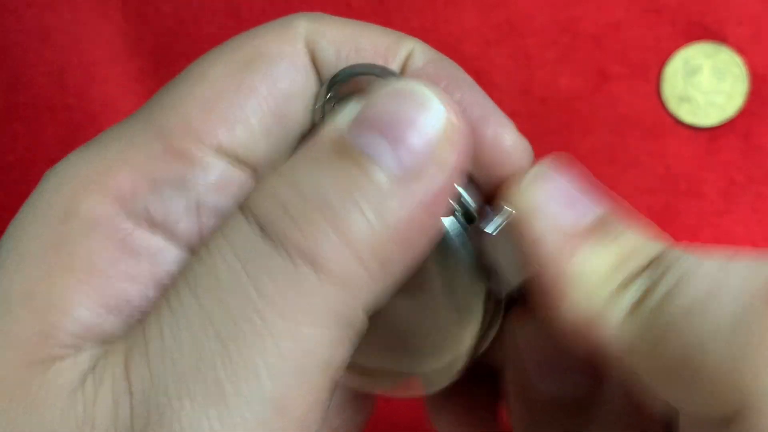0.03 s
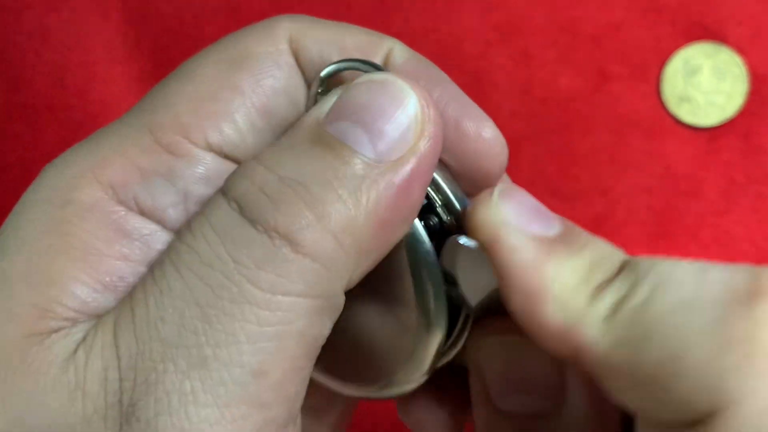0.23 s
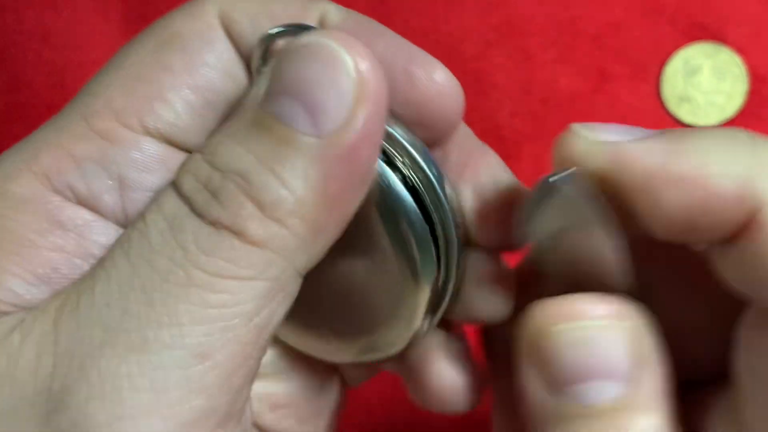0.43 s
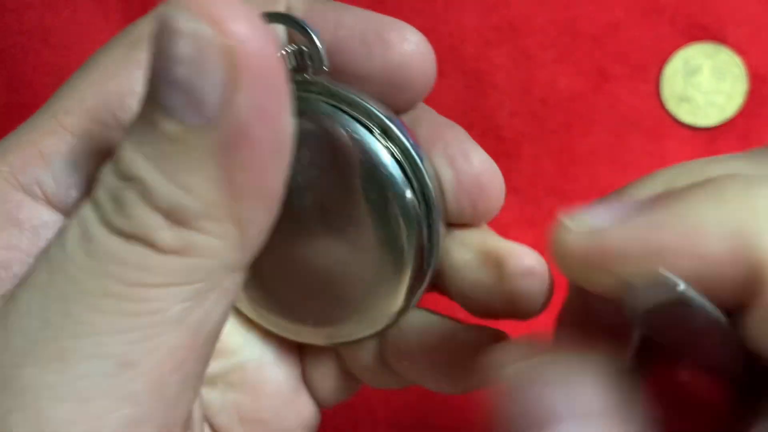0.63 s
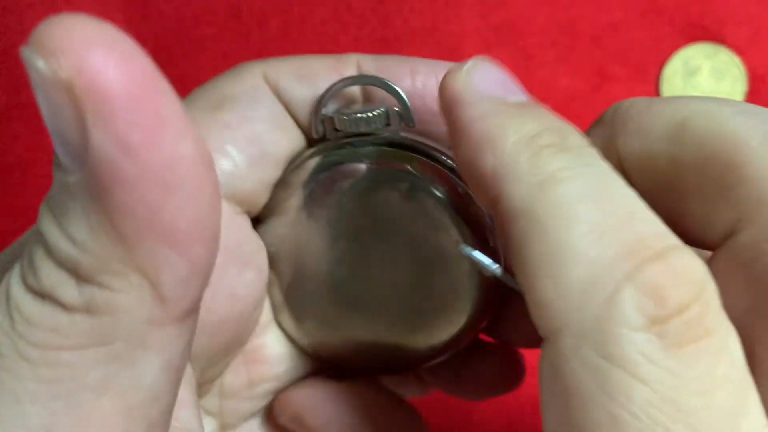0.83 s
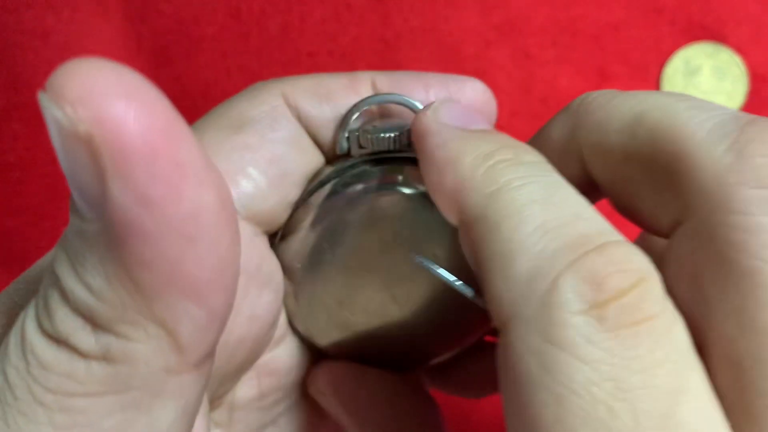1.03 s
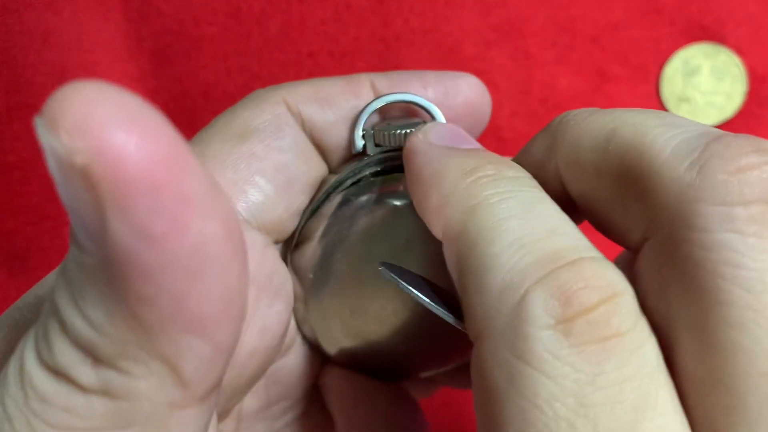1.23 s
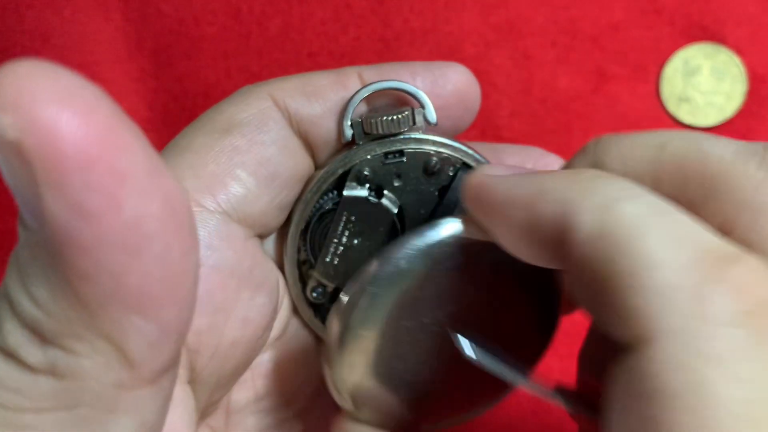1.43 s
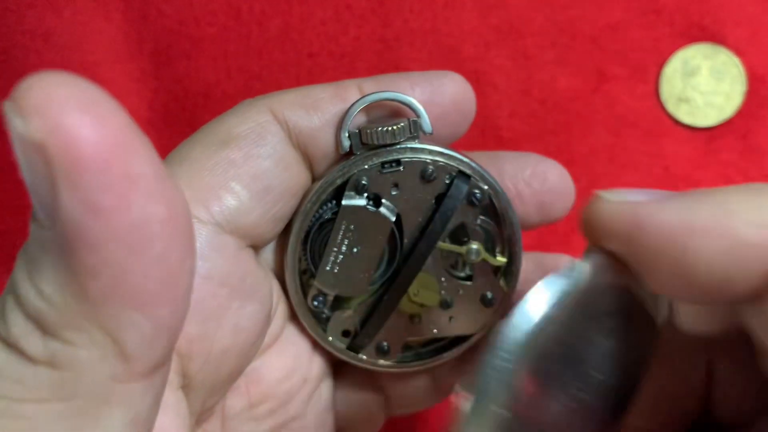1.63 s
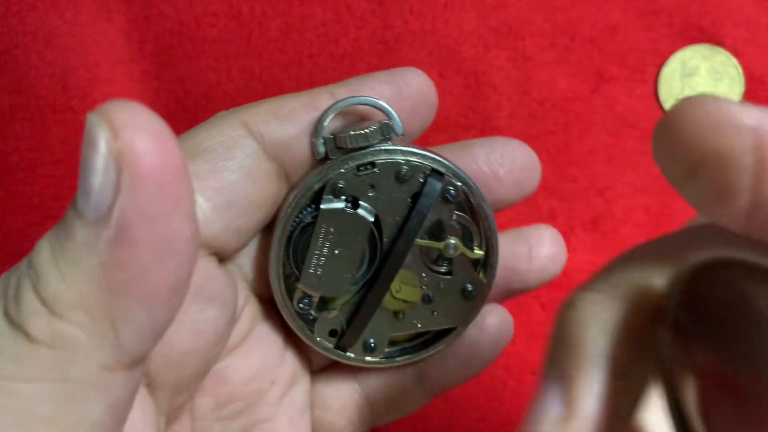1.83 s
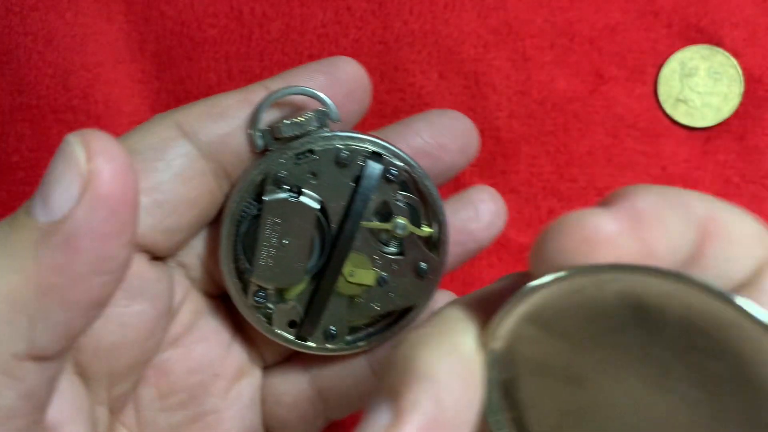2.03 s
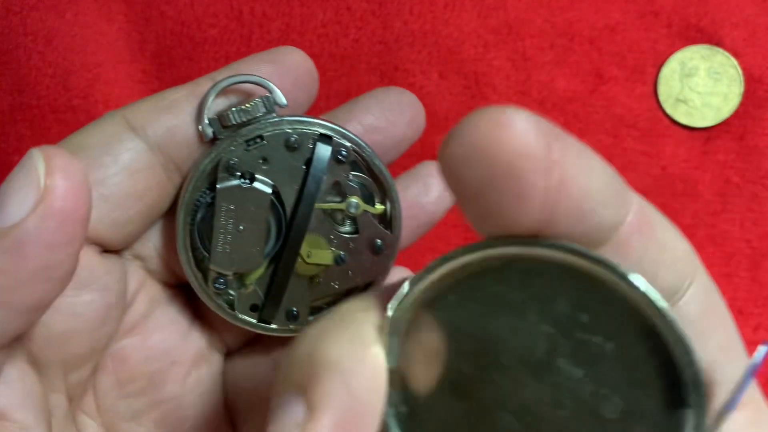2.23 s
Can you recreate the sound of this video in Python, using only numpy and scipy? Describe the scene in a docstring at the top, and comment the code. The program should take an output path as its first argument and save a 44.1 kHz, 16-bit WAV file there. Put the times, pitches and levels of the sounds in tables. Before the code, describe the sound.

A sharp steel snap as a blade pries the back off a pocket watch. Lighter knocks, scrapes and a thin clink follow, with soft finger rubbing and faint, quick ticking, heard close up in a small, quiet room.

```python
"""A sharp steel snap comes first: a blade pries the back off a pocket watch, close by in a small room.
The freed back knocks against the rim, which makes the case ring, and clinks as it is lifted away.
Steel scrapes on steel and fingers rub. The clockwork ticks four times a second over a faint low hum."""
import sys
import numpy as np
from scipy import signal
from scipy.fft import rfft, irfft
from scipy.io import wavfile

SR = 44100
rng = np.random.default_rng(int(sys.argv[2]) if len(sys.argv) > 2 else 0)


def put_to_file(sound):
    """Save the sound as 16-bit audio at rate SR, in the file named by the first command-line argument."""
    columns = np.atleast_2d(sound).T  # one column per channel
    safe = np.clip(columns, -1, 1)
    whole_steps = np.round(safe * 32767)
    wavfile.write(sys.argv[1], SR, whole_steps.astype(np.int16))


N = 101429

# A mode is one tone that an object rings with. A fade is the time a sound takes to drop by 60 dB.
# Bright modes of the rim letting go: pitch_hz, level_db
RIM_MODES = [(8850, -7), (9950, -7.5), (11450, -5), (12950, -9.5)]
# Thump of the hands: pitch_hz, level_db, fade_s
JOLT_MODES = [(467, -27.5, .018), (301, -29, 0.032), (170, -36, .03)]
# Steel knocking on the case: start_s, ring_db, crack_db, left_minus_right_db, favoured_hz, fade_s
KNOCK_EVENTS = [(0.05, -35.5, -39, 5.5, 1500, 0.036), (0.0623, -9.5, -9, 1, 1280, 0.0058),
                (0.064, -12, -15.5, -15, 1760, 0.013), (0.2745, -44, -44, -12, 2450, 0.027),
                (0.2957, -22, -28.5, 7, 4700, 0.0067), (0.2973, -26.5, -37, -14.5, 2200, 0.017),
                (0.482, -45.5, -48, -12.5, 1520, .04), (0.4921, -38.5, -54, -4, 4000, 0.025),
                (0.5149, -54, -44.5, -1, 3900, .02), (0.525, -43, -59, -9.5, 1450, 0.021),
                (0.64, -45, -47.5, -7, 2375, 0.029), (0.8112, -45.5, -44.5, -1, 3450, 0.03),
                (0.9156, -41, -40, -3.5, 2000, 0.024), (1.028, -55, -52, -9.5, 1560, 0.073)]
# Case modes that the hand muffles: pitch_hz, level_db
MUFFLED_MODES = [(730, -12), (1030, -6), (1300, -9.5), (1580, -0.5), (1820, -7.5), (2080, -8.5), (2370, 2),
                 (3450, -9), (3950, -9), (4420, -6.5), (5740, -10), (7100, -13.5)]
# Case modes that escape the hand and ring on: pitch_hz, level_db, fade_s
FREE_MODES = [(1497, -28, .17), (2354, -29, 0.077), (4410, -29, 0.11)]
# Tone colour of cracking steel: pitch_hz, level_db
CRACK_COLOUR = [(350, -14), (750, -3), (1400, 3), (2400, 3), (3200, -10), (6500, -6.5), (8800, -3),
                (11500, -5.5), (13300, -7.5), (16000, -19)]
# Light touches on the loose back: start_s, level_db
CLINK_EVENTS = [(0.9135, -41), (1.289, -56.5)]
# Modes of the loose back: pitch_hz, level_db, fade_s
BACK_MODES = [(6760, -9.5, 0.019), (8370, -15.5, 0.2), (9200, -9, 0.046), (9800, -11, 0.045),
              (11200, -8, 0.034), (12100, 0.5, 0.03)]
# Clockwork beats, tock and tick in turn: start_s, level_db
BEAT_EVENTS = [(.5553, -37), (.8107, -55), (1.0553, -44.5), (1.3111, -43), (1.5558, -39), (1.8121, -43.5),
               (2.0579, -41)]
# Modes of the clockwork: pitch_hz, tock_db, tick_db, fade_s
CLOCKWORK_MODES = [(2400, -27.5, -48, 0.018), (5670, -15.5, -19, 0.015), (8300, -11, -15, .025),
                   (10400, -19.5, -6, 0.0089), (11200, -10, 0.5, 0.019), (11950, -15.5, 0, 0.021),
                   (12900, -18.5, -8.5, 0.017), (14500, -8, -25, 0.011)]
# Blade and back sliding on the rim: start_s, length_s, level_db
SCRAPE_EVENTS = [(0.287, 0.0081, -46.5), (0.466, 0.096, -55.5), (0.744, 0.099, -57), (1.755, 0.095, -64)]
# Tone colour of a scrape: pitch_hz, level_db
SCRAPE_COLOUR = [(600, -27), (1100, -9), (1600, 6.5), (3000, -6.5), (4300, -3), (7000, -8), (12000, -9.5),
                 (15500, -24)]
# Nail and blade tapping steel: start_s, level_db
TOUCH_EVENTS = [(0.3744, -50.5), (0.665, -56.5), (1.2694, -60.5), (1.582, -55), (1.772, -56), (1.9436, -63),
                (2.0152, -59), (2.2717, -55.5), (2.292, -57)]
# Tone colour of the smallest metal contacts: pitch_hz, level_db
CONTACT_COLOUR = [(2000, -32), (5000, -7), (7500, -11), (9500, -0.5), (12300, -2), (15500, -15)]
# Crackle of steel moving in the fingers: time_s, level_db
CRACKLE_LOUDNESS = [(.85, -94), (1.02, -66), (1.15, -80.5), (1.55, -79.5), (1.9, -88)]
# Skin rubbing on skin and steel: time_s, level_db
RUB_LOUDNESS = [(0, -55), (.12, -56.5), (.42, -54.5), (.66, -57.5), (.8, -53.5), (.94, -57.5), (.965, -74),
                (1.16, -70.5), (1.2, -55), (1.335, -53), (1.36, -70.5), (1.405, -68), (1.435, -51.5),
                (1.5, -55), (1.76, -55), (1.78, -78.5), (2.3, -86.5)]
# Tone colour of the rubbing: pitch_hz, level_db
RUB_COLOUR = [(50, -5), (110, -2.5), (280, 1.5), (430, -3.5), (620, -11), (900, -7.5), (1500, -19.5),
              (2300, -13.5), (7000, -31.5), (15000, -43)]
# Tone colour of the room's reflections: pitch_hz, level_db
ROOM_COLOUR = [(450, -7), (800, 2.5), (2500, -7), (5500, -2.5), (8800, -5), (13000, -8.5), (16000, -17.5)]
# Tone colour of the steady room noise: pitch_hz, level_db
AIR_COLOUR = [(60, -6.5), (120, -9.5), (250, -8), (500, -17), (1500, -6), (2000, -14), (3500, -19),
              (6200, -19), (9500, -23), (13500, -29), (15500, -45)]
# A low hum that comes and dies away: time_s, level_db
HUM_LOUDNESS = [(.08, -56), (.12, -63.5), (.45, -57.5), (.78, -59), (.95, -68), (2.3, -78.5)]
# How alike left and right noise are (1 is the same, 0 unrelated): pitch_hz, likeness
STEREO_LIKENESS = [(200, 0.92), (400, 0.6), (900, -0.096), (4400, -0.088), (8000, 0.53), (11000, 0.18),
                   (16000, 1)]

SNAP_S = .0619  # the moment the back lets go
CRACK_RISE_S, CRACK_HOLD_S, CRACK_FADE_S = .0005, .00072, .0067
FOCUS_DB_PER_OCTAVE, LEFT_LAG_S = 5, .00022
BEAT_SCATTER_DB, RATTLE_FADE_S, REBOUND_S, REBOUND_DB = 5.5, .017, .0013, -7.5


def snap():
    """The rim springs over its seat with a flash of treble and jolts the hands; a grainy tail dies away."""
    rise = np.clip(clock()[:SR // 2] / .00059, 0, 1)
    flash = ring([(hz, db, .0056) for hz, db in RIM_MODES]) * rise
    noise_tail = amp(-32.5) * fade(clock() - SNAP_S, fade_s=.31) * hiss(CRACK_COLOUR)
    return at(flash + ring(JOLT_MODES), SNAP_S) + noise_tail * grain(per_s=700, depth_db=2.5)


def case_knocks():
    """Each knock is a bright crack plus a ring of the case; the spot struck favours some modes."""
    crack, out = hiss(CRACK_COLOUR), 0
    for start, ring_db, crack_db, pan_db, favoured_hz, fade_s in KNOCK_EVENTS:
        modes = [(hz, db, fade_s) for hz, db in MUFFLED_MODES] + FREE_MODES
        body = ring([(hz, db - FOCUS_DB_PER_OCTAVE * abs(np.log2(hz / favoured_hz)), decay)
                     for hz, db, decay in modes])
        stereo_body = pan(pan_db) * np.array([at(body, start + LEFT_LAG_S), at(body, start)])
        t = clock() - start
        burst = np.clip(t / CRACK_RISE_S, 0, 1) * fade(np.maximum(t - CRACK_HOLD_S, 0), CRACK_FADE_S)
        out = out + amp(crack_db) * burst * crack + amp(ring_db) * stereo_body
    return out


def back_clinks():
    """The freed back rings high and thin when touched."""
    note = ring(BACK_MODES)
    return sum(amp(db) * at(note, start) for start, db in CLINK_EVENTS)


def clockwork():
    """Tock and tick ring the same plates in a mix that is never twice alike; each rattles and bounces."""
    rattle, out = amp(-7) * hiss(CONTACT_COLOUR), 0
    scatter = BEAT_SCATTER_DB * rng.standard_normal((len(BEAT_EVENTS), len(CLOCKWORK_MODES)))
    for k, (start, db) in enumerate(BEAT_EVENTS):
        note = ring([(hz, (tick_db if k % 2 else tock_db) + extra_db, fade_s)
                     for (hz, tock_db, tick_db, fade_s), extra_db in zip(CLOCKWORK_MODES, scatter[k])])
        t = clock() - start
        contacts = fade(t, RATTLE_FADE_S) + amp(REBOUND_DB) * fade(t - REBOUND_S, RATTLE_FADE_S)
        out = out + amp(db) * (at(note, start) + rattle * contacts)
    return out


def scrapes():
    """Steel slides on steel in short gritty strokes that swell and die."""
    swell = sum(amp(db) * np.sin(np.pi * np.clip((clock() - start) / length, 0, 1))
                for start, length, db in SCRAPE_EVENTS)
    return swell * hiss(SCRAPE_COLOUR) * grain(per_s=340, depth_db=4)


def touches():
    """Nail and blade make tiny dry taps over a faint crackle of steel moving in the fingers."""
    taps = sum(amp(db) * fade(clock() - start, fade_s=.029) for start, db in TOUCH_EVENTS)
    contact = hiss(CONTACT_COLOUR)
    crackle = curve(CRACKLE_LOUDNESS) * grain(per_s=1900, depth_db=7.5)
    return contact * (taps + crackle)


def fingers():
    """Skin rubs softly while the hands shift their grip."""
    return curve(RUB_LOUDNESS) * hiss(RUB_COLOUR) * grain(per_s=200, depth_db=.5)


def room(sound):
    """The small room answers with one clear echo, a cluster of reflections and a weaker, longer tail."""
    t = clock() - .004  # the reflections take a moment to arrive
    decay = (fade(t, fade_s=.19) + amp(-14) * fade(t, fade_s=.85)) * grain(per_s=820, depth_db=-.5)
    reflections = hiss(ROOM_COLOUR) * decay / np.linalg.norm(decay)
    echo = amp(-21) * at(sound, start_s=.0125)
    return amp(-15) * signal.fftconvolve(sound[None], reflections, axes=1)[:, :N] + echo


def hum(pitch_hz, width_hz):
    """A narrow band of noise sounds like a wavering tone."""
    hz = np.arange(N // 2 + 1) * SR / N
    return noise(1 / (1 + (2 * (hz - pitch_hz) / width_hz) ** 2))


def background():
    """Faint room air, one low hum that stays and one that dies away."""
    air = amp(-65.5) * hiss(AIR_COLOUR)
    lasting_hum = amp(-60) * hum(pitch_hz=63.2, width_hz=25)
    fading_hum = curve(HUM_LOUDNESS) * hum(pitch_hz=122.3, width_hz=16)
    return air + lasting_hum + fading_hum


def amp(db):
    """Turn decibels into a gain, the number a sound is multiplied by."""
    return 10 ** (np.asarray(db) / 20)


def clock():
    """The time of every sample, in seconds."""
    return np.arange(N) / SR


def by_frequency(points):
    """Read a table of pitch_hz, value at every frequency."""
    hz, value = np.array(points).T
    return np.interp(np.log(np.arange(N // 2 + 1) * SR / N + 1), np.log(hz), value)


def curve(points):
    """Turn a table of time_s, level_db into a gain over time."""
    return amp(np.interp(clock(), *np.array(points).T))


def noise(gain):
    """Stereo noise of strength 1, shaped by a gain per frequency; the sides agree in the bass and top."""
    alike = np.clip(by_frequency(STEREO_LIKENESS), -.99, .99)
    mid, side = rfft(rng.standard_normal((2, N))) * gain * np.sqrt([1 + alike, 1 - alike])
    stereo = irfft([mid + side, mid - side], N)
    return stereo / stereo.std()


def hiss(colour):
    """Stereo noise with the given tone colour."""
    return noise(amp(by_frequency(colour)))


def grain(per_s, depth_db):
    """Random flutter of a level, as when a surface catches and slips."""
    steps = rng.standard_normal(N)
    return amp(depth_db * np.interp(clock() * per_s, np.arange(N), steps))


def fade(t, fade_s):
    """A level that jumps to 1 at t = 0 and dies away."""
    return (t >= 0) * np.exp(-np.log(1000) * np.clip(t / fade_s, 0, 10))


def ring(modes):
    """One blow sets off a fading tone for each mode; every second one starts the opposite way."""
    t = clock()[:SR // 2]
    return sum((-1) ** k * amp(db) * np.sin(2 * np.pi * hz * t) * fade(t, fade_s)
               for k, (hz, db, fade_s) in enumerate(modes))


def at(sound, start_s):
    """Place a sound at its start time."""
    return np.pad(sound, (max(int(start_s * SR), 0), N))[:N]


def pan(db):
    """Two gains that put the left side db above the right."""
    return amp(np.array([[db], [-db]]) / 2)


def scene():
    """The watch and the hands in the room."""
    steel = snap() + case_knocks() + back_clinks() + clockwork() + scrapes() + touches()
    return steel + room(steel[1]) + fingers() + background()


def record(dry):
    """Thin the deep bass, round off the peak of the snap and cut the highest treble."""
    ceiling, bottom_hz, top_hz = .75, 42, 16000
    thinned = signal.sosfilt(signal.butter(3, bottom_hz, "high", fs=SR, output="sos"), dry)
    rounded = ceiling * np.tanh(thinned / ceiling)
    return signal.sosfilt(signal.ellip(8, .2, 70, top_hz, fs=SR, output="sos"), rounded)


dry = scene()
out = record(dry)
put_to_file(out)
```